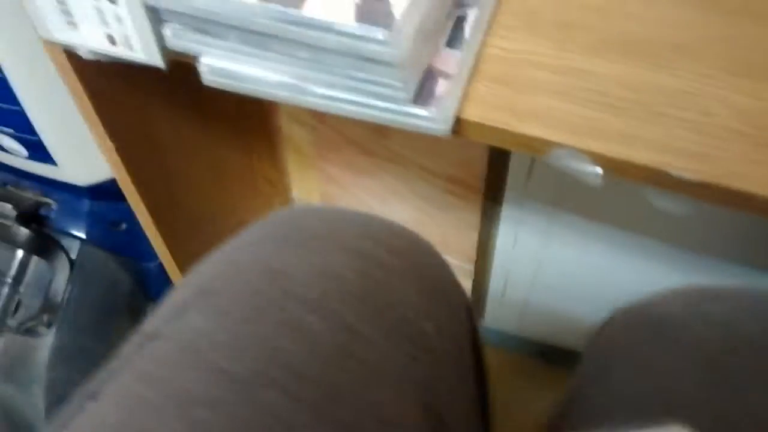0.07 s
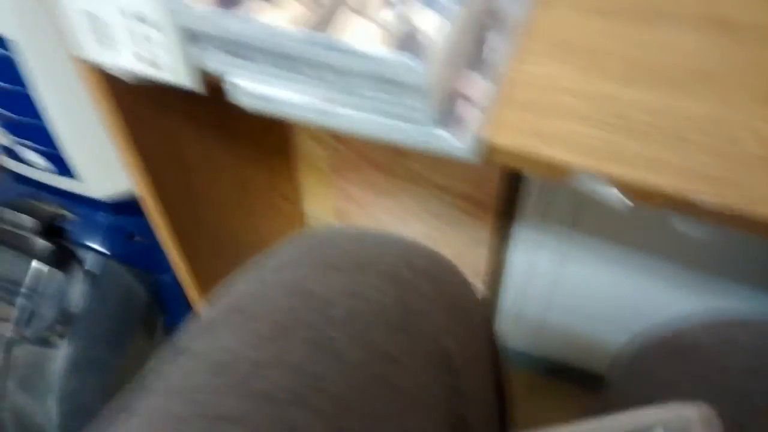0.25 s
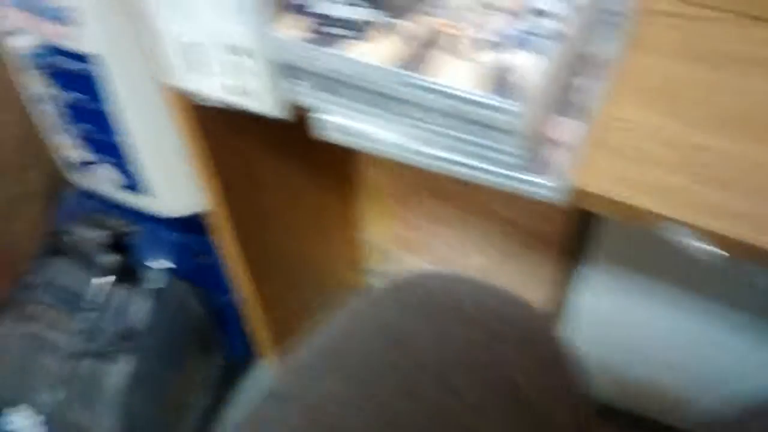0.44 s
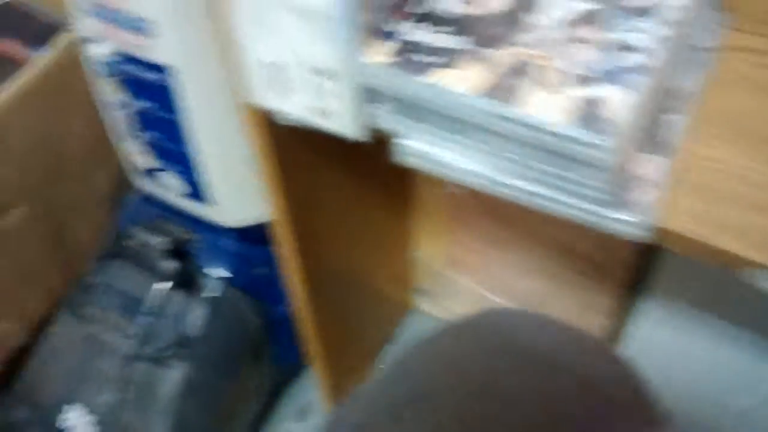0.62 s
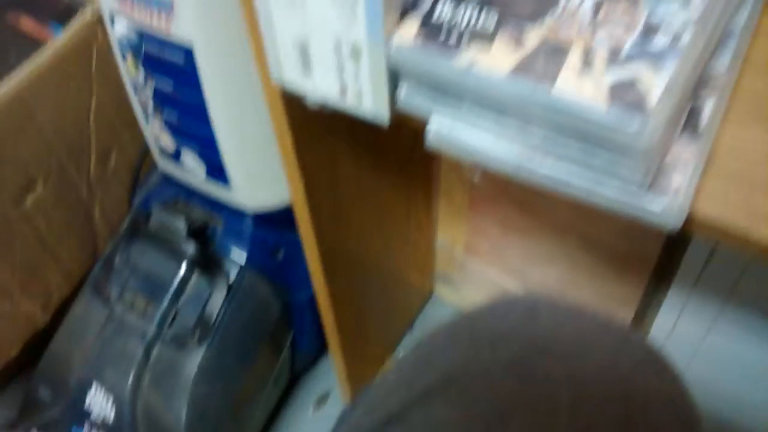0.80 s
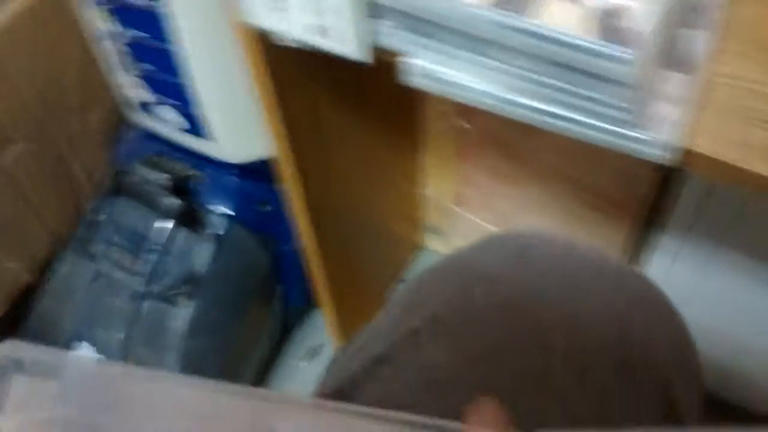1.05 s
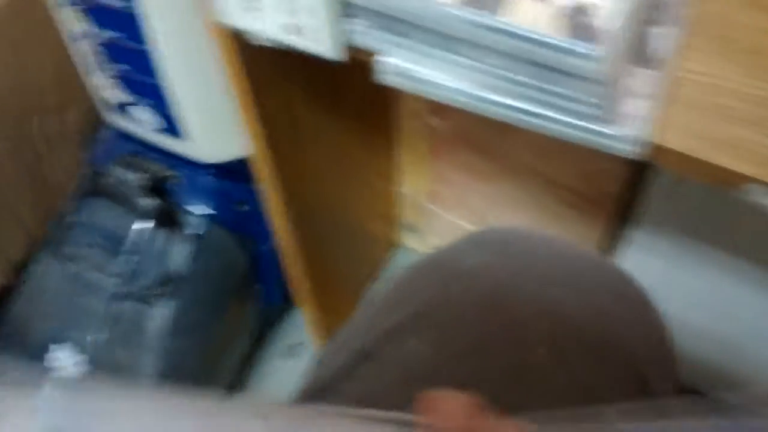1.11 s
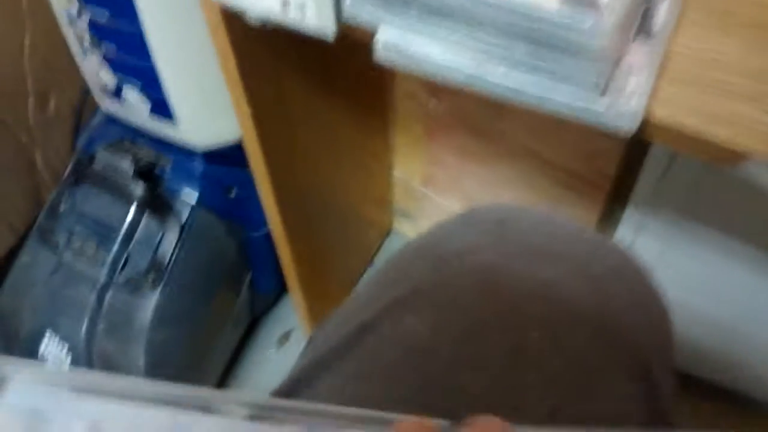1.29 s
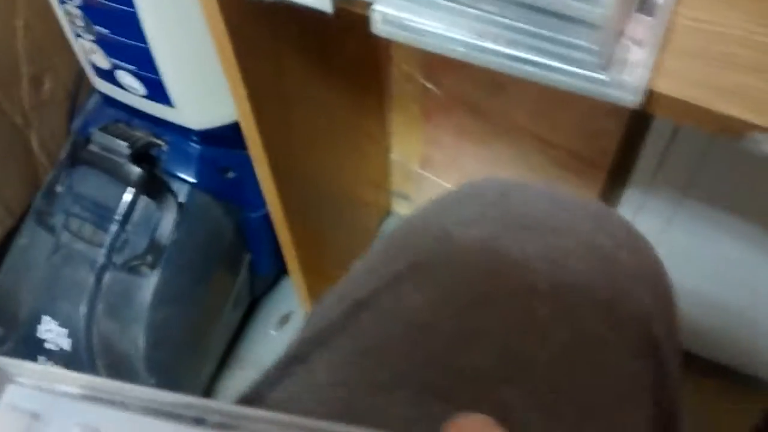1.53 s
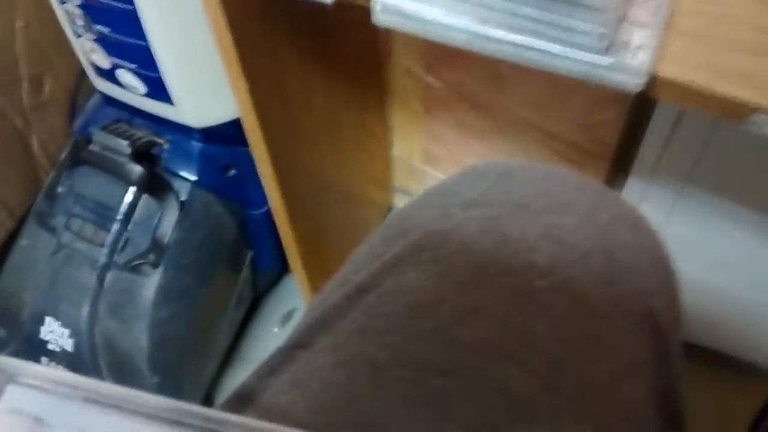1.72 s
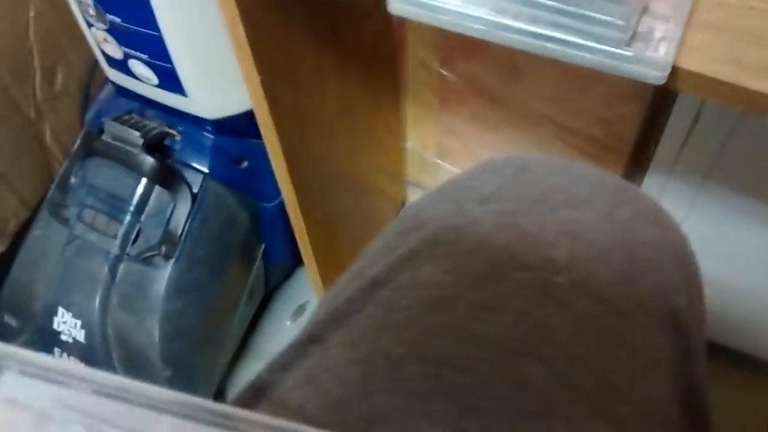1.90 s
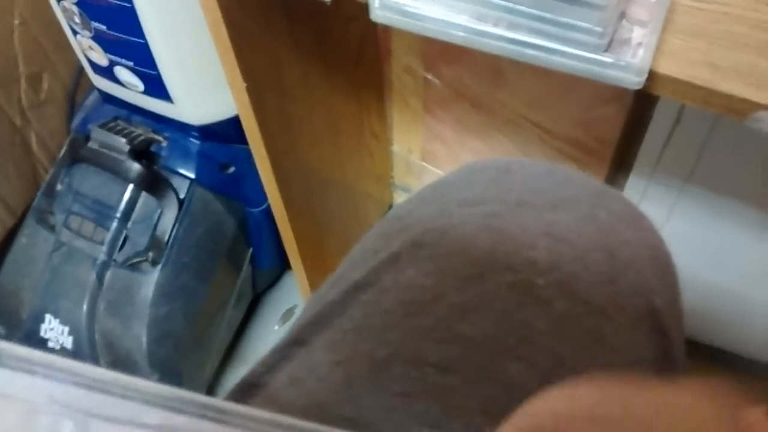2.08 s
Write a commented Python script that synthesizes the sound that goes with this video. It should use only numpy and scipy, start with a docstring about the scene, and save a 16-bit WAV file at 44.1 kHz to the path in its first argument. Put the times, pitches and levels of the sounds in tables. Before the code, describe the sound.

One sharp snap of a plastic disc case opening, followed by creaks and small clicks.

```python
"""A sharp plastic snap, close up in a small room: the catch of a clear disc case lets go.
The hinge creaks in a run of slips and the lid ticks under the fingers. Each of these contacts is a
push and a brief chatter that ring the shell. Fingertips slide over the plastic, the hands bump it
softly and sleeves brush, over room air, hiss and a low hum. The level dips briefly after the snap."""
import sys
import numpy as np
from scipy import signal
from scipy.fft import rfft, irfft
from scipy.io import wavfile
from scipy.ndimage import uniform_filter1d

SR = 44100
rng = np.random.default_rng(int(sys.argv[2]) if len(sys.argv) > 2 else 0)


def generate_wav(sig):
    """Save sig (samples, or channels by samples) to the path in sys.argv[1] as 16-bit PCM at SR."""
    pcm = np.round(np.clip(np.atleast_2d(sig).T, -1, 1) * 32767).astype(np.int16)
    wavfile.write(sys.argv[1], SR, pcm)


N = 94815

# the catch letting go: start_s, level_db, body_db, hollow_db, mid_db, bright_db, treble_db, chatter (0-1)
CATCH_SNAPS = [(.2089, -12.5, 4.5, 4.5, 2.5, 3.5, -1.5, 0.49), (.2155, -20, 14, 11, -0.5, 7, -9, 0.22),
               (.2222, -29.5, 4.5, 7, 18, -1, -2, 0.66), (.2302, -25.5, 6, -6.5, 7.5, 10, -7, 0.9),
               (.2405, -26.5, 4, -6, 12, -8, 9, 0.5), (.2445, -15.5, 6.5, 8.5, 5, 12, 3.5, 0.51),
               (.2483, -22, 9, 13, 10, -13, 0, 0), (.2545, -26.5, 1, 1, 9, -4, -8, 0.47),
               (.273, -30.5, -7, 9, 4, -16, -5, 0.54)]
# the hinge slipping as the lid swings: start_s, level_db, body_db, hollow_db, mid_db, bright_db, treble_db
HINGE_SLIPS = [(.683, -35.5, 2.5, 0, 1, 1, -13), (0.6966, -27, 1.5, 1.5, 3, -1.5, -17),
               (0.713, -26, -8.5, -2.5, 0, -4, -16), (0.7167, -34, -13, 1, 12, 4, -6),
               (0.728, -24, -5, -4, -7, -11, -14), (0.741, -35.5, -14, -2, 1, 4, 0),
               (0.7525, -39, -42, 0, 12, 0, 0), (0.7586, -38, 7, 1, 5, 0, -4),
               (.801, -25, -2.5, -1.5, -5, 2, -2), (0.805, -23.5, 5, -2, 5.5, 2, -5)]
# the lid ticking: start_s, level_db, body_db, hollow_db, mid_db, bright_db, treble_db
LID_TICKS = [(.005, -50.5, 10, 15, -11, 4.5, 8), (.330, -41, -7, -6, 9, 2, -11),
             (0.361, -44.5, 4, -6, 5, 8, -8), (0.4882, -40, 1.5, 6, 10.5, 7, 8),
             (0.5121, -37.5, 2, -1.5, 12, 5.5, -5), (.571, -46.5, 1, 1, -2, 3, -4),
             (0.5967, -32, 0.5, -2, 10, -10.5, -6.5), (.610, -36, -1, 0, 0, 1.5, -7),
             (0.624, -50.5, -8, 6, -24, 16, 16.5), (0.6368, -40.5, -3, 4, 5, 11, 13.5),
             (.860, -40, 4.5, 0.5, 2, -12, -14), (0.943, -44.5, -22, -3, 2, 1, -6),
             (1.198, -49.5, -3, -1, 9.5, 6, 7), (1.2617, -28.5, -0.5, -6.5, 5, -6.5, -8.5),
             (1.274, -45, 9, 1, 9, 7, 8), (1.2961, -36, -15, -6, -16, 4.5, 7),
             (1.2985, -37.5, 5, 12.5, 13, -2, 9), (1.336, -30, -0.5, 9.5, 6, 4, 4),
             (1.4515, -42.5, 1, 0, 6.5, 1.5, 4), (1.535, -46.5, -9, 8.5, 4.5, -4, 2),
             (1.58, -42.5, -5, -2, -9, -12, -10), (2.055, -54, -1, 1, 14.5, 11, 0)]
# a contact's EQ points (body, hollow, mid, a 0 dB anchor, bright, treble): freq_hz
CONTACT_EQ_HZ = [350, 650, 1400, 2500, 4000, 7000]
# what the shell rings with: pitch_hz, level_db, t60_s, left_over_right_db, left_lead_rad
SHELL_MODES = [(419.6, -9.5, 0.026, 6.5, -0.13), (635.5, -6, 0.019, 6, -0.5), (686, -10.5, 0.02, 5, 1.7),
               (1014, -21.5, 0.004, 30, -8), (1390, -13, 0.022, -2, 1.33), (1668, -7.5, 0.014, -10, 1.35),
               (2213, 0.5, 0.032, -2.5, 3), (2601, 4.5, .016, -2.5, 4), (3168, -8, 0.0079, -11, 0.36),
               (3850, -11, 0.0088, -12.5, 1.43), (4400, -14.5, 0.012, -4.5, 4),
               (5600, -20.5, 0.011, 18, -5.5), (6400, -13, 0.0042, -7, 0.38)]
# tone of the bare tick of a contact: freq_hz, gain_db
TICK_TONE = [(40, -31), (150, 1), (400, 7), (800, 5.5), (1500, -2.5), (3500, -1.5), (5000, -14.5),
             (8000, -9.5), (11000, -24.5), (16000, -36)]
# fingertips and lid rubbing on the plastic: start_s, length_s, first_db, last_db, hiss_over_rub_db
RUB_STROKES = [(0.63, 0.048, -55.5, -53, 5), (.682, 0.047, -42, -37.5, -15), (0.798, 0.002, -40, -33, -12),
               (0.911, .11, -54, -51.5, -9.5), (1.401, 0.012, -53, -44.5, -4),
               (1.577, 0.016, -52, -52.5, -17), (1.845, 0.14, -43.5, -51.5, -49),
               (1.916, 0.073, -62, -40, -5)]
# tone of the rubbing: freq_hz, gain_db
RUB_TONE = [(100, -7), (550, 3), (850, -5), (1350, 6), (2000, 0), (2600, -6.5), (3200, -3), (3700, -11),
            (4300, -12), (5300, -18.5), (6800, -21.5), (10000, -28.5), (16000, -38)]
# stereo placement of the rubbing: freq_hz, left_over_right_db
RUB_PAN = [(500, -1), (1200, -0.5), (2400, -3), (4000, -11), (6500, 9), (12000, -0.5)]
# soft bumps of the hands: start_s, level_db, pitch_hz
HAND_BUMPS = [(0.242, -35, 40), (0.492, -49, 84), (0.582, -31.5, 88), (.645, -41, 90), (0.689, -30.5, 91.5),
              (0.711, -36, 100), (0.74, -30.5, 111), (0.798, -33, 109), (0.811, -32, 61),
              (1.028, -45, 87.4), (1.26, -41.5, 86), (1.296, -43, 97), (1.339, -36.5, 58)]
# swell of the brushing sleeves: time_s, level_db
SLEEVE_SWELL = [(0, -55), (.2, -57), (.44, -58.5), (.65, -51.5), (.85, -54), (.98, -51), (1.15, -54),
                (1.4, -61.5), (1.7, -60), (2.15, -60.5)]
# tone of the sleeves: freq_hz, gain_db
SLEEVE_TONE = [(60, -5.5), (180, -4.5), (300, -0.5), (650, -3.5), (1000, -13.5), (4000, -39), (16000, -49)]
# decay of the small room: freq_hz, t60_s
ROOM_DECAY = [(150, 0.22), (600, 0.13), (2300, 0.21), (4200, 0.15), (12000, 0.08)]
# tone of its reflections: freq_hz, gain_db
ROOM_TONE = [(150, -13.5), (600, -11), (1500, -14.5), (2500, -19.5), (4000, -10), (12000, -8)]
# tone of room air and microphone hiss: freq_hz, gain_db
AIR_TONE = [(12, -60), (20, 1.5), (63, -5), (172, -15.5), (590, -19.5), (660, -25), (1440, -20),
            (2320, -25.5), (3630, -21.5), (16000, -33.5)]
# how alike left and right are in air and sleeves: freq_hz, correlation (-1 to 1)
STEREO_LIKENESS = [(30, -0.48), (100, -0.5), (400, 0.29), (1200, 0.98), (2500, -0.02), (16000, 0)]

TAPS = 8192  # samples in one contact, bump or filter
SNAP_T60_S, SLIP_T60_S, LID_T60_S = 0.051, 0.026, 0.027  # how long the chatter lasts
SLIP_CHATTER, LID_CHATTER, CHATTER_DB = 0.88, 0.7, 4.5
TICK_DB, TICK_RIGHT_LAG_S = 2, .00008
GRIP_DETUNE, GRIP_SPREAD_DB, RISE_CYCLES = 0.03, 3, 1
GRAINS_PER_S, GRAIN_SPREAD_DB, HISS_ABOVE_HZ = 10000, 1, 4550
STROKE_ATTACK_S, STROKE_RELEASE_S = 0.0021, 0.014
BUMP_RISE_S, BUMP_RIGHT_DB = 0.0059, -14
ROOM_PREDELAY_S = .005
AIR_DB, HUM_DB, HUM_HZ = -52.5, -65.5, 60
DUCK_ABOVE_DB, DUCK_SHARE, DUCK_LAG_S, RECOVER_DB_PER_S = -37, 0.32, 0.079, 46
CUTOFF_HZ = 15700


def contact(db, body_db, hollow_db, mid_db, bright_db, treble_db, chatter, chatter_t60_s):
    """A push and a brief chatter of the loose halves ring through the case and into the room."""
    fade = amp(-60 * np.arange(TAPS) / SR / chatter_t60_s)
    grains = rng.standard_normal(TAPS) ** 3 * fade  # cubing makes the noise spiky
    drive = chatter * amp(CHATTER_DB) * grains / np.linalg.norm(grains)
    drive[0] += np.sqrt(1 - chatter ** 2)  # the push
    eq = tone_filter(list(zip(CONTACT_EQ_HZ, [body_db, hollow_db, mid_db, 0, bright_db, treble_db])))
    sound = amp(db) * irfft(flattened(drive) * eq * shell_response())
    return sound + room(sound)


def flattened(drive):
    """Spectrum of a burst of contacts, evened out so that only the case gives it a pitch."""
    spectrum = rfft(drive)
    power = uniform_filter1d(abs(spectrum) ** 2, size=24)
    excess_db = 10 * np.log10(power / power.mean() + 1e-9)
    return spectrum * tone_filter(np.c_[np.fft.rfftfreq(TAPS, 1 / SR), -excess_db])


def shell_response():
    """Stereo spectrum of the struck shell: a bare tick and short modes, shifted a little by each grip."""
    t, hz = np.arange(TAPS) / SR, np.fft.rfftfreq(TAPS, 1 / SR)
    right = np.array([[0], [1]])
    lag = np.exp(-2j * np.pi * hz * TICK_RIGHT_LAG_S * right)
    out = amp(TICK_DB) * unit(irfft(tone_filter(TICK_TONE) * lag))
    for pitch_hz, db, t60, pan_db, lead in SHELL_MODES:
        shift, weight = rng.standard_normal(2)
        wave = np.cos(2 * np.pi * pitch_hz * (1 + GRIP_DETUNE * shift) * t - lead * right)
        envelope = amp(-60 * t / t60) * (1 - np.exp(-t * pitch_hz / RISE_CYCLES))
        out += amp(db + GRIP_SPREAD_DB * weight + (.5 - right) * pan_db) * unit(envelope * wave)
    energy = np.sum(out ** 2) / 2
    return rfft(out * np.sqrt(.005 * SR / energy))  # as much energy as 5 ms at an rms of one


def finger_rubs():
    """Skin and lid catch and slip on the plastic in dense tiny grains; some strokes also hiss."""
    t, hz = np.arange(N) / SR, np.fft.rfftfreq(N, 1 / SR)
    size = amp(GRAIN_SPREAD_DB * np.minimum(rng.exponential(1, N), 4))
    catches = rng.random(N) < GRAINS_PER_S / SR
    tone = amp(curve_at(RUB_TONE, hz) + np.array([[.5], [-.5]]) * curve_at(RUB_PAN, hz))
    grains = rfft(size * catches * rng.standard_normal((2, N))) * tone
    highpass = 1 - np.exp(-(hz / HISS_ABOVE_HZ) ** 4)
    rub, hiss = unit(irfft(grains, N)), unit(irfft(grains * highpass, N))
    out = np.zeros((2, N))
    for start, length, first_db, last_db, hiss_db in RUB_STROKES:
        attack = np.clip((t - start) / STROKE_ATTACK_S, 0, 1)
        release = np.exp(-np.maximum(t - start - length, 0) / STROKE_RELEASE_S)
        ramp = amp(np.interp(t, [start, start + length], [first_db, last_db]))
        out += attack * release * ramp * (rub + amp(hiss_db) * hiss)
    return out


def hand_bumps():
    """The hands push the whole case: a low swing that dies in a cycle or two."""
    out, t = np.zeros((2, N)), np.arange(TAPS) / SR
    envelope = t / BUMP_RISE_S * np.exp(1 - t / BUMP_RISE_S)
    for start, db, hz in HAND_BUMPS:
        swing = -envelope * np.sin(2 * np.pi * hz * t)
        add(out, start, amp([[db], [db + BUMP_RIGHT_DB]]) * swing)
    return out


def sleeves():
    """Cloth brushing: a dull noise that swells and sinks."""
    swell_db = np.interp(np.arange(N) / SR, *np.transpose(SLEEVE_SWELL))
    return amp(swell_db) * stereo_noise(SLEEVE_TONE)


def room(sound):
    """Dense reflections from the desk and walls, new for each contact, dying band by band."""
    hz, t, noise = signal.stft(rng.standard_normal((2, TAPS)), SR, nperseg=256)
    fade = amp(-60 * t / curve_at(ROOM_DECAY, hz)[:, None])
    band_energy = np.mean(fade ** 2, axis=1, keepdims=True) * TAPS
    fade *= amp(curve_at(ROOM_TONE, hz))[:, None] / np.sqrt(band_energy)
    tail = signal.istft(noise * fade, SR, nperseg=256)[1]
    delayed = np.pad(tail, ((0, 0), (round(ROOM_PREDELAY_S * SR), 0)))
    return signal.fftconvolve(sound, delayed, axes=1)[:, :TAPS]


def air_and_hum():
    """The steady bed: room air, microphone hiss and mains hum."""
    hum = np.sqrt(2) * np.sin(2 * np.pi * (HUM_HZ * np.arange(N) / SR + rng.random()))
    return amp(AIR_DB) * stereo_noise(AIR_TONE) + amp(HUM_DB) * hum


def stereo_noise(tone):
    """Coloured noise, partly alike in the two channels."""
    hz = np.fft.rfftfreq(N, 1 / SR)
    left, independent = rfft(rng.standard_normal((2, N)))
    likeness = np.clip(curve_at(STEREO_LIKENESS, hz), -1, 1)
    right = likeness * left + np.sqrt(1 - likeness ** 2) * independent
    return unit(irfft(np.array([left, right]) * amp(curve_at(tone, hz)), N))


def tone_filter(tone):
    """Spectrum of a minimum-phase filter through points of freq_hz, gain_db."""
    log_gain = np.log(amp(curve_at(tone, abs(np.fft.fftfreq(TAPS, 1 / SR)))))
    return np.exp(np.conj(signal.hilbert(log_gain)))[:TAPS // 2 + 1]


def curve_at(points, hz):
    """Reads a table on a log-frequency axis."""
    point_hz, value = np.transpose(points)
    return np.interp(np.log(hz + 1), np.log(point_hz + 1), value)


def amp(db):
    """Decibels to gain."""
    return 10 ** (np.asarray(db) / 20)


def unit(x):
    """Scales to an rms of one."""
    return x / np.sqrt(np.mean(x ** 2) + 1e-20)


def add(mix, start_s, sound):
    """Mixes a stereo sound in at a time."""
    part = mix[:, max(round(start_s * SR), 0):][:, :sound.shape[1]]
    part += sound[:, :part.shape[1]]


def scene():
    """Catch, hinge and lid over the handling noises and the bed."""
    mix = air_and_hum() + hand_bumps() + finger_rubs() + sleeves()
    for start, *snap in CATCH_SNAPS:
        add(mix, start, contact(*snap, SNAP_T60_S))
    for start, *slip in HINGE_SLIPS:
        add(mix, start, contact(*slip, SLIP_CHATTER, SLIP_T60_S))
    for start, *tick in LID_TICKS:
        add(mix, start, contact(*tick, LID_CHATTER, LID_T60_S))
    return mix


def record(dry):
    """A slow gain control dips after the snap; peaks stop at full scale and the very top is cut."""
    pole = np.exp(-1 / (DUCK_LAG_S * SR))
    smoothing = [1 - pole], [1, -pole]
    power_db = 10 * np.log10(signal.lfilter(*smoothing, (dry ** 2).mean(0)) + 1e-12)
    fall_db = np.arange(N) / SR * RECOVER_DB_PER_S
    held_db = np.maximum.accumulate(power_db + fall_db) - fall_db  # peak hold with a steady release
    over_db = np.maximum(held_db - DUCK_ABOVE_DB, 0)
    ducked = dry * amp(-DUCK_SHARE * signal.lfilter(*smoothing, over_db))
    lowpass = signal.firwin(301, CUTOFF_HZ, window=("kaiser", 8), fs=SR)
    return signal.oaconvolve(np.clip(ducked, -1, 1), lowpass[None], "same")


dry = scene()
out = record(dry)
generate_wav(out)
```